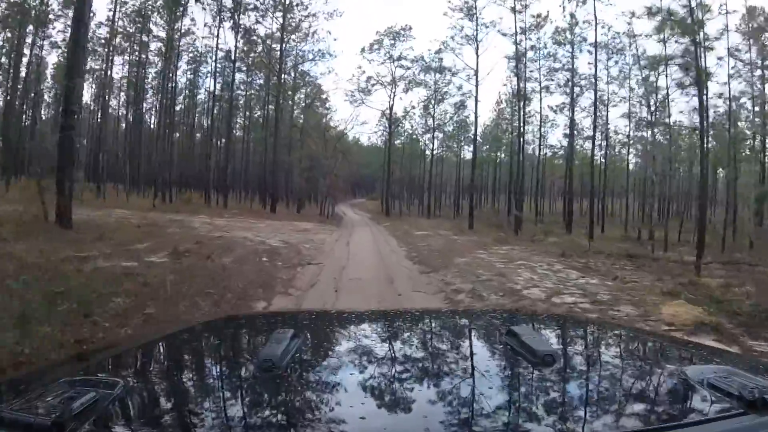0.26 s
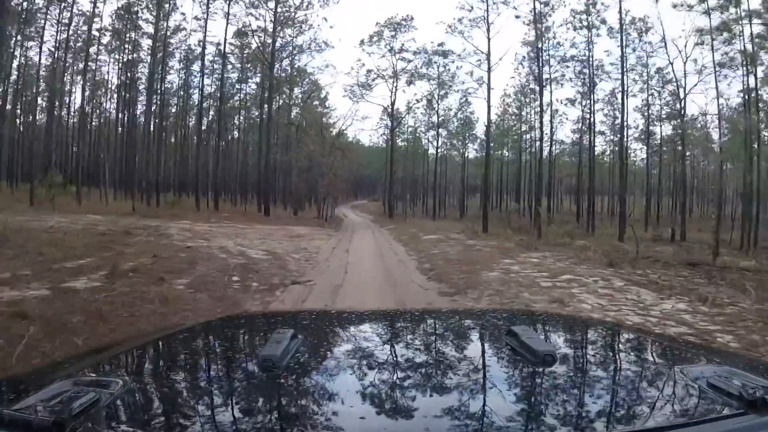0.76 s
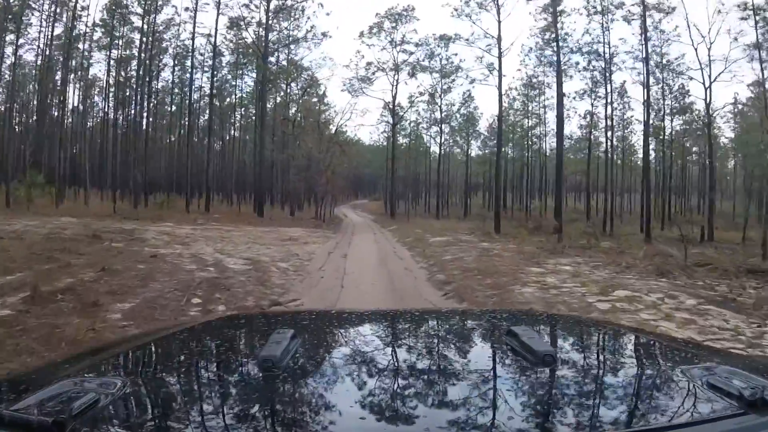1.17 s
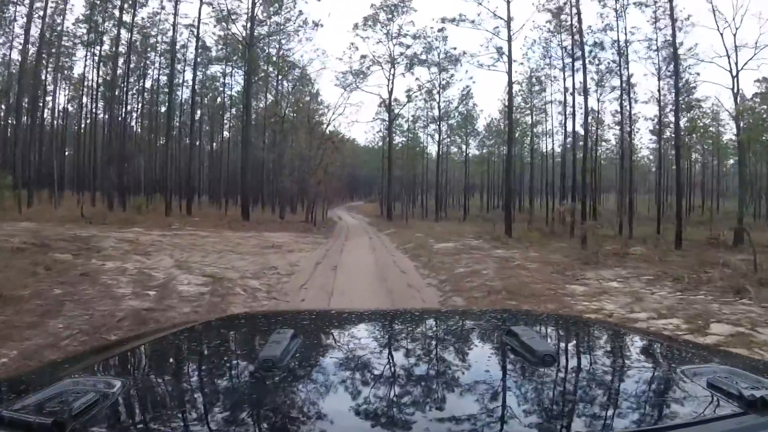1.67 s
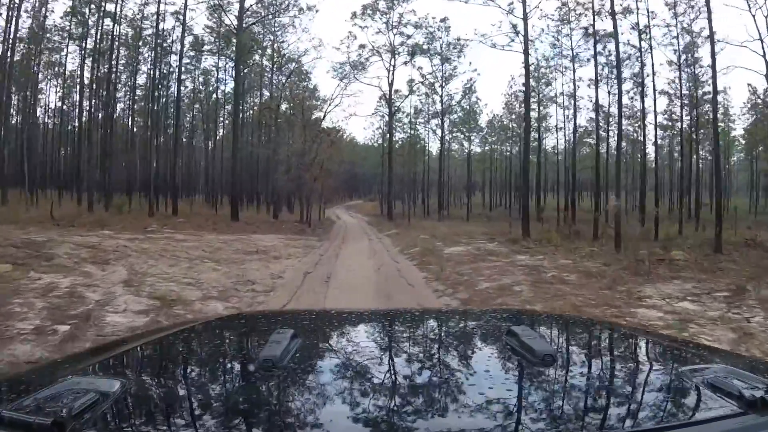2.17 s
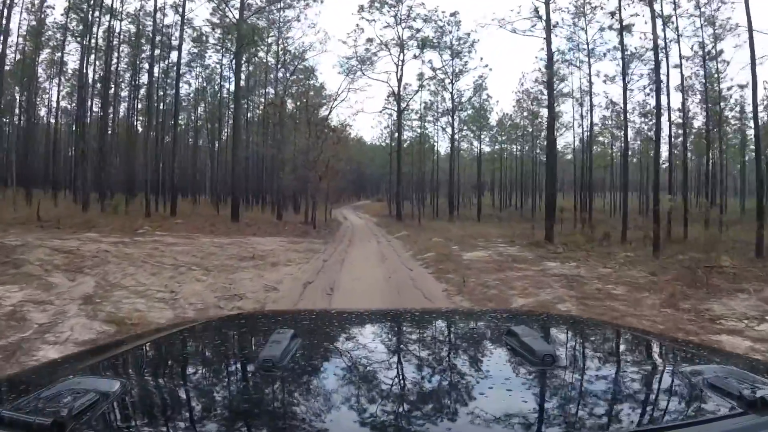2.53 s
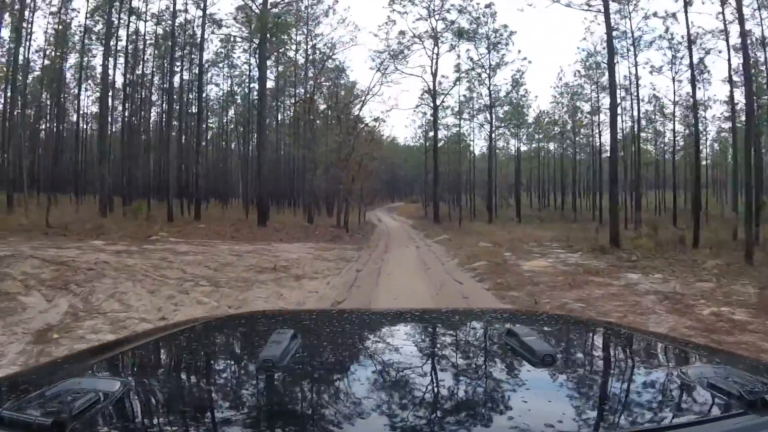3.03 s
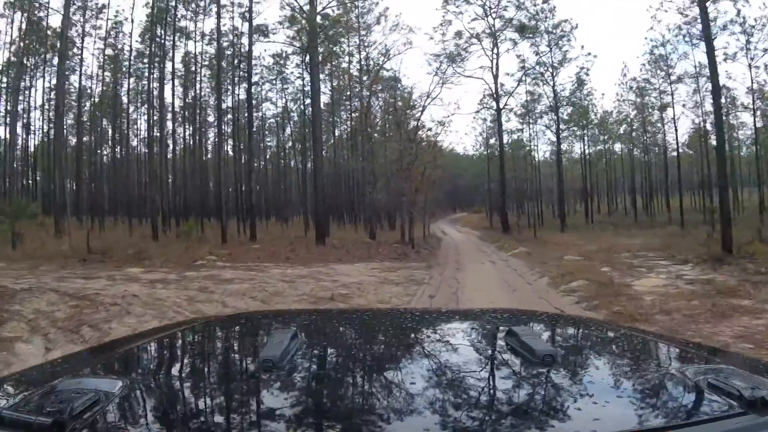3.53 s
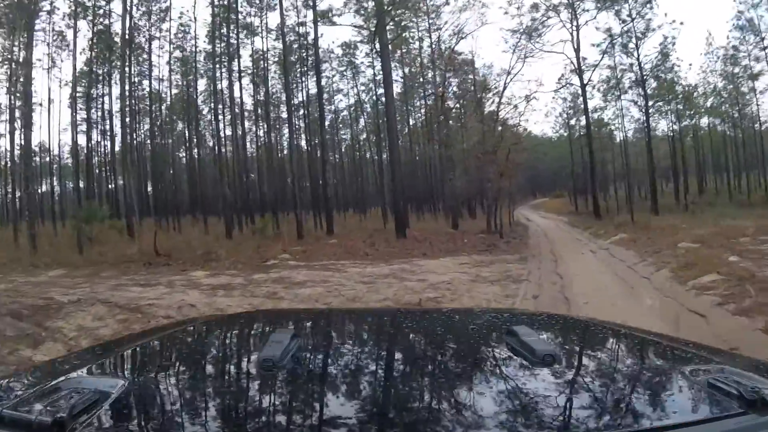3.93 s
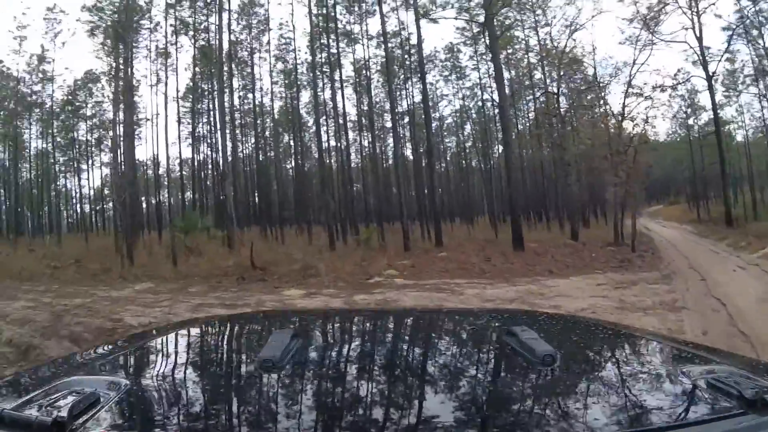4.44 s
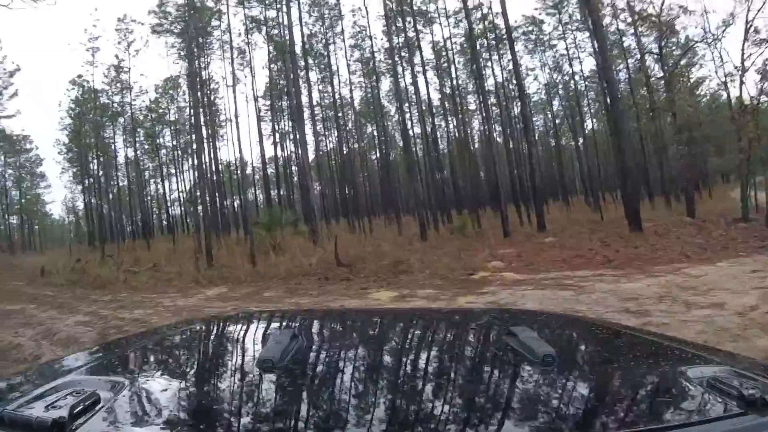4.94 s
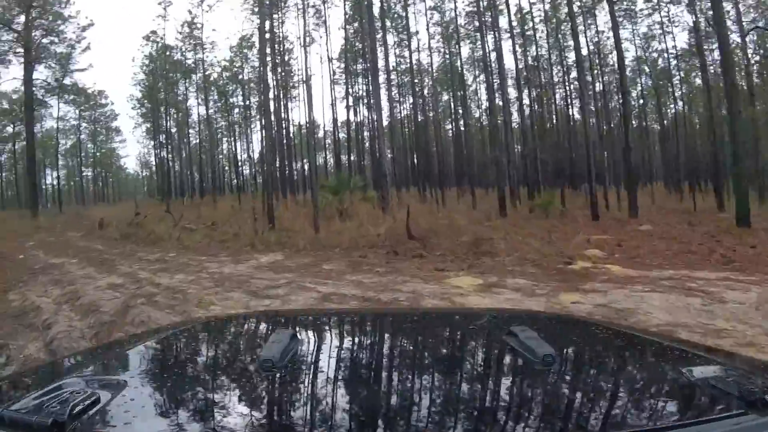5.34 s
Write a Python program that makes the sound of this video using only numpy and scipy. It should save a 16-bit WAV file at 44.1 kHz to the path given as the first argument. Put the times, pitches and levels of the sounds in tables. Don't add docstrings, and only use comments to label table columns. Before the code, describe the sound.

Inside an off-road vehicle's cab on a sandy forest trail, a heavy, bassy engine rumble fills the sound. From 0 to about 2.7 seconds its pitch sinks steadily as the vehicle slows, with a faint thin gear hum gliding down alongside and stopping near 2.75 as the drive briefly unloads. The engine then holds a low, uneven throb. Throughout, the body shudders over ruts, tyres rumble and thud on roots, muffled road roar comes through the floor and fine sand hisses softly. Early trim noises are sparse, with a small rap and tick at 1.9. From 3.4 they increase, crowding between 3.8 and 4.45 with dull knocks, bright raps and thin ticks, strongest near 4.17; a short fan of sand hisses at 4.3. After 5 seconds a low boom arrives, climbs and swells around 5.45, with a few last knocks. Faint steady microphone hiss lies underneath.

```python
import sys
import numpy as np
from scipy import signal
from scipy.io import wavfile
from scipy.ndimage import uniform_filter1d

SR = 44100
rng = np.random.default_rng(int(sys.argv[2]) if len(sys.argv) > 2 else 0)


def digitize_waveform(pressure):
    field = np.atleast_2d(pressure).T
    bounded = np.clip(field, -1, 1)
    quanta = np.round(bounded * 32767).astype(np.int16)
    wavfile.write(sys.argv[1], SR, quanta)


def makeup_ratio(level_db):
    decades = np.asarray(level_db, float) / 20
    return 10 ** decades


N = 246947
T = np.arange(N) / SR


def evened(x):
    return x / np.sqrt(np.mean(x ** 2) + 1e-20)


def column(rows, index):
    rows = np.array(rows)
    return np.interp(T, rows[:, 0], rows[:, index])


def wander(top_hz):
    t = T[::256]
    slow = np.zeros(len(t))
    for f in np.geomspace(top_hz / 20, top_hz, 16):
        slow += np.sin(2 * np.pi * (f * t + rng.random())) / np.sqrt(f)
    return np.interp(T, t, evened(slow))


def lift(passing_hz, peaks):
    coarse_hz = passing_hz[::256]
    gain_db = sum(top_db / (1 + ((coarse_hz - hz) / width) ** 2) for hz, width, top_db in peaks)
    return np.interp(T, T[::256], gain_db)


def swells(rows):
    return sum(db * np.exp(-((T - s) / length) ** 2) for s, db, length in rows)


def noise(spectrum, patchy_db, flicker_db, size):
    frames = 4 * N // size + 5
    hz = np.fft.rfftfreq(size, 1 / SR)
    real, imaginary, patches = rng.standard_normal((frames, len(hz), 3)).T
    patches = uniform_filter1d(patches, size=8, axis=0)
    patches = evened(uniform_filter1d(patches, size=10, axis=1))
    flicker = rng.standard_normal(frames)
    f, db = np.transpose(spectrum)
    colour_db = np.interp(np.log(hz + 1), np.log(f + 1), db, left=-90, right=-90)[:, None]
    z = (real + 1j * imaginary) * makeup_ratio(colour_db + patchy_db * patches + flicker_db * flicker)
    return evened(signal.istft(z, nperseg=size, noverlap=size * 3 // 4)[1][:N])


# t/s, crank rate/turns per s
CRANK = [(0.0, 17.64), (0.6, 17.03), (1.2, 15.74), (2.1, 13.27), (2.65, 11.88), (3.3, 12.1), (4.1, 11.85),
         (4.45, 11.4), (4.62, 11.5), (4.88, 11.25), (5.05, 11.38), (5.2, 11.7), (5.6, 11.75)]
# t/s, level/dB
LOAD = [(0.0, -28), (0.15, 0), (0.7, 3.5), (0.8, -1), (1.02, 2), (1.12, -1.5), (2.0, 2), (2.62, -0.5),
        (2.8, -20), (3.0, -1), (3.5, -2.5), (4.4, -4), (4.58, 1.5), (4.74, -3.5), (4.88, 2), (5.15, 3),
        (5.3, -2.5), (5.6, -1.5)]
STRONG_ORDERS = (2, 3, 6, 12)
STRONG_DB = [-41, -44, -56, -61.5]
LOAD_SHARE = [2.23, 0.37, 1.6, 0.6]
WEAK_ORDERS = (4, 5, 7, 8, 9, 10, 11, 13, 14, 15, 16, 17, 18, 20, 21, 24)
WEAK_DB = [-44.5, -56, -62.5, -59, -62, -64.5, -62.5, -78, -85, -71.5, -74.5, -69.5, -58, -70, -67, -72]
# f/Hz, width/Hz, level/dB
BOOMS = [(32.65, 1.18, 16.5), (45.7, 2.5, 9), (68, 2.12, 21), (74.5, 2.4, 11.5), (86.9, 2.9, 16),
         (136.1, 5.4, 12), (145.7, 5.1, 9), (164.1, 7.6, 17), (180.7, 4.3, 12)]
# f/Hz, width/Hz, level/dB
PANELS = [(86, 7.2, 7.5), (125.6, 2.9, 9.5), (169, 9.4, 8), (220, 4.9, -1), (258.8, 2.8, 9),
          (300.5, 4.7, 2)]


def engine():
    speed = column(CRANK, index=1)
    load_db = column(LOAD, index=1)
    turns = np.cumsum(speed) / SR
    out = np.zeros(N)
    for order, db, share in zip(STRONG_ORDERS, STRONG_DB, LOAD_SHARE):
        phase = order * turns + rng.random() + 0.016 * wander(25.0)
        level_db = db + share * load_db + lift(order * speed, BOOMS)
        out += makeup_ratio(level_db) * np.sin(2 * np.pi * phase)
    for order, db in zip(WEAK_ORDERS, WEAK_DB):
        phase = order * turns + rng.random() + 0.015 * wander(6.5)
        level_db = db + lift(order * speed, PANELS) + 2.92 * wander(1.41)
        out += makeup_ratio(level_db) * np.sin(2 * np.pi * phase)
    return np.sqrt(2) * out, turns


# t/s, f/Hz
MESH = [(0.0, 390.2), (0.8, 367.6), (1.2, 344.0), (2.2, 282.7), (2.75, 254.0)]
# f/Hz, width/Hz, level/dB
HOUSING = [(359.8, 22, 20), (305.4, 10, 15), (266, 17.4, 18)]


def gear():
    gear_db, unload_s = -73, 2.75
    mesh_hz = column(MESH, index=1)
    phase = np.cumsum(mesh_hz) / SR + 0.01 * wander(1.7)
    loaded = np.clip((unload_s - T) / .1, 0, 1)
    return np.sqrt(2) * makeup_ratio(gear_db + lift(mesh_hz, HOUSING)) * loaded * np.sin(2 * np.pi * phase)


# t/s, level/dB
WORK = [(0.0, 1), (0.1, 4), (0.9, 3), (1.4, 1.3), (2.4, 0.1), (3.1, 0), (3.9, 1), (4.25, 3), (4.45, 2),
        (4.7, 0), (5.0, -1.2), (5.2, 2.2), (5.4, 1.5), (5.6, 0.5)]


def worked(level_db, share):
    return level_db + share * column(WORK, index=1)


def stiffened(x, share=0.45):
    swing = np.sqrt(uniform_filter1d(x ** 2, size=1500) + 0.049)
    return evened(x / swing ** share)


# f/Hz, level/dB per Hz
SHAKE = [(7.1, -18), (12, -24), (21, 5), (32, 10), (48, 5.5), (65, -11.5), (77, -8), (90, -18.5),
         (120, -17.5), (200, -120)]
# t/s, level/dB, length/s
BUMPS = [(0.09, 9, 0.048), (0.31, 9, 0.038), (0.67, 7, 0.15), (0.97, 9, 0.063), (1.15, 12, 0.061),
         (1.39, 13, 0.037), (1.66, 12, 0.043), (2.11, 10, 0.033), (2.33, 3, 0.057), (2.55, 11, 0.024),
         (2.72, 7, 0.029), (2.92, 2, 0.14), (3.22, 3, 0.051), (3.51, 13.5, 0.016), (3.65, 8, 0.026),
         (4.05, 9.5, 0.026), (4.25, 11.5, 0.045), (4.53, 7, 0.036), (4.72, 9.5, 0.037), (5.07, 1, 0.059),
         (5.45, 0, .06)]


def shake():
    level_db = worked(-31.5, share=0.75) + swells(BUMPS) - 6
    return makeup_ratio(level_db) * stiffened(noise(SHAKE, 0.95, 0.43, size=8192))


ROLL = [(55, -22), (70, 7), (80, 1.5), (95, -0.5), (113, -18), (135, -3.5), (170, -21.5), (230, -24),
        (270, -17)]
# t/s, level/dB, length/s
THUDS = [(0.13, 10, 0.02), (0.27, -15, 0.029), (0.5, 4, 0.17), (1.04, 11, 0.062), (1.29, 7, 0.041),
         (1.72, 6, 0.098), (2.0, 7, 0.079), (2.44, 4, 0.035), (2.72, 5.5, 0.059), (2.95, 2.5, .08),
         (3.27, 6, 0.05), (3.42, 8, 0.082), (3.49, 11, .03), (3.85, 13.5, 0.21), (4.25, 13, 0.06),
         (4.5, 10, 0.16), (4.76, 12, .06), (5.29, 11, 0.079), (5.58, 13, .05)]


def roll():
    level_db = worked(-45, share=0.13) + swells(THUDS) - 4.5
    return makeup_ratio(level_db) * noise(ROLL, 2.5, 0.4, size=4096)


def breath(turns):
    return 0.15 * np.cos(2 * np.pi * turns) + 0.26 * np.cos(6 * np.pi * turns)


# f/Hz, level/dB per Hz
ROAR = [(110, -28.5), (180, 0), (210, -3.5), (273, -1), (388, -10.5), (494, -5.5), (589, -13), (900, -36),
        (1170, -27), (1980, -120)]


def roar(turns):
    return makeup_ratio(worked(-51, share=0.43) + breath(turns)) * noise(ROAR, 1.38, 1.0, size=2048)


# f/Hz, level/dB per Hz
HISS = [(410, -72), (700, 0), (1230, -7), (1480, -5.5), (1900, -11), (2060, -8.5), (2700, -11.5),
        (3250, -9.5), (3590, -18.5), (4200, -23), (5460, -43), (9240, -120)]


def hiss(turns):
    return makeup_ratio(worked(-59, share=0.9) + breath(turns)) * noise(HISS, 1.28, 0.57, size=512)


# f/Hz, level/dB per Hz
SAND = [(3200, -35), (3700, -7), (4100, -2.5), (4800, 4.5), (5500, 5), (6000, 1.5), (6600, -13),
        (8000, -23)]


def spray():
    scrub_db = swells([(4.3, 7.5, 0.082)])
    return makeup_ratio(worked(-73.5, share=0.93) + scrub_db) * noise(SAND, 1.24, 0.74, size=512)


# f/Hz, t60/s
TRIM = [(270, 0.042), (350, 0.055), (450, .04), (560, .04), (630, 0.032), (700, 0.016), (780, 0.084),
        (950, 0.0073), (1200, 0.017), (1500, 0.015), (1800, 0.0032), (2150, 0.006), (2500, 0.011),
        (2900, 0.035), (3400, 0.005), (3900, 0.0085), (4500, 0.01), (5200, 0.0059), (5900, 0.0067),
        (6600, 0.014), (7500, 0.0019), (8600, 0.0044)]


def rattle(peak_db, hz, spread, length):
    t = np.arange(4096) / SR
    length = max(length, .001)
    white, contact = rng.standard_normal((2, 4096))
    drive = white * (0.18 + (abs(contact) > 2.2)) * np.exp(-t / length)
    drive[0] = 0.052 / np.sqrt(length)
    ring = np.zeros(4096)
    for f, t60 in TRIM:
        mode_db = -6 * (np.log2(f / hz) / spread) ** 2 - 60 * t / t60
        ring += makeup_ratio(mode_db) * np.sin(2 * np.pi * f * t) / np.sqrt(t60)
    lowpass = signal.butter(6, 9300., fs=SR)
    out = signal.lfilter(*lowpass, signal.fftconvolve(drive, ring)[:4096])
    return makeup_ratio(peak_db) * out / abs(out).max()


def grit():
    hit = rng.random(N) < 60 / SR
    clicks = makeup_ratio(2.6 * np.minimum(rng.exponential(1, N), 2.8)) * hit
    grain = rattle(0, 1500, 1.1, .003)
    return makeup_ratio(worked(-70.0, share=1)) * evened(signal.oaconvolve(clicks, grain)[:N])


# f/Hz, level/dB per Hz
PORT = [(4500, -35), (6050, -14), (6480, 0.5), (7000, -7.5), (8200, -10), (9500, -12.5), (10300, -18.5),
        (11700, -14.5), (13000, -17), (13800, -26), (14300, -49)]


def microphone_hiss():
    return makeup_ratio(-67.5 - 0.56) * noise(PORT, 0.8, 0.16, size=1024)


# t/s, peak level/dB, f/Hz, spread/octaves, length/s
RAPS = [(0.152, -40, 1600, 0.79, 0.0088), (1.906, -37.5, 1800, 0.15, 0.0023),
        (2.373, -45, 1684, 0.22, 0.013), (2.753, -47, 1500, .1, 0.0067), (3.478, -43, 1150, 0.25, 0.0034),
        (3.479, -47, 1800, 0.14, 0.009), (3.544, -41.5, 1170, 0.1, .004), (3.917, -30, 2180, 1.4, 0.013),
        (3.999, -35.5, 1900, 0.4, 0.006), (4.164, -40.5, 1500, 0.18, 0.006),
        (4.178, -35, 1330, 0.22, 0.006), (4.432, -38.5, 1500, 0.8, 0.0091),
        (4.437, -35, 2410, 0.48, 0.0045), (5.060, -47, 1490, 0.61, .005), (5.13, -43, 1450, 0.25, 0.009),
        (5.200, -42.5, 1410, 0.37, 0.0076), (5.368, -44, 2000, 0.26, 0.0051)]
# t/s, peak level/dB, f/Hz, spread/octaves, length/s
TICKS = [(0.318, -48, 5000, .5, 0.0037), (1.906, -45.5, 3640, 0.34, 0.012),
         (2.139, -43, 3400, 0.13, 0.0033), (2.14, -44.5, 5760, 0.12, 0.007),
         (3.418, -45.5, 5480, 0.67, 0.035), (3.917, -38.5, 4600, 0.25, 0.0044),
         (4.002, -51, 6000, 0.28, 0.0092), (4.176, -41, 4540, 0.58, 0.019), (4.229, -44, 5260, 0.15, 0.018),
         (4.547, -48, 6000, 0.42, 0.013), (5.204, -53, 5500, 0.34, 0.014), (5.555, -47, 3980, 0.4, 0.0058)]
# t/s, peak level/dB, f/Hz, spread/octaves, length/s
KNOCKS = [(0.562, -45.5, 1030, 0.19, 0.059), (3.823, -40.5, 494, 0.15, 0.035),
          (3.967, -37.5, 328, 0.16, 0.016), (1.909, -41, 910, 0.14, 0.0078),
          (3.543, -32.5, 294, 0.18, 0.0044), (3.952, -31, 650, 0.75, 0.0036),
          (4.089, -32.5, 750, 0.7, 0.0066), (4.174, -24.5, 610, 0.16, 0.0045),
          (4.195, -36, 280, 0.37, 0.017), (4.24, -32, 303, 0.33, 0.025), (4.436, -31, 325, 0.27, 0.018),
          (4.591, -45, 1030, 0.28, 0.032), (4.619, -38.5, 392, 0.35, 0.0055),
          (5.227, -32, 258, 0.15, 0.018)]


def trim():
    out = np.zeros(N + 4096)
    for s, *blow in KNOCKS + RAPS + TICKS:
        start = round(s * SR)
        out[start:start + 4096] += rattle(*blow)
    return out[:N]


# t/s, f/Hz, level/dB
HEAVE = [
    (4.95, 32.45, -65),
    (5.1, 32, -30),
    (5.3, 36.9, -35),
    (5.45, 40.6, -27),
    (5.6, 42.3, -31.5),
]


def heave():
    phase = np.cumsum(column(HEAVE, index=1)) / SR
    return np.sqrt(2) * makeup_ratio(column(HEAVE, index=2)) * np.sin(2 * np.pi * phase)


def sparse_top(x, from_hz, keep, hole_db):
    hz, _, z = signal.stft(x, SR, nperseg=1536, noverlap=768)
    power = abs(z) ** 2
    usual = uniform_filter1d(np.median(power, axis=-1, keepdims=True), size=9, axis=-2)
    fade_in = np.clip((hz[:, None] - from_hz) / 700, 0, 1)
    bar = keep * makeup_ratio(0.7 * rng.standard_normal(z.shape[-1])) * fade_in
    gain = np.where(power < bar * usual, makeup_ratio(hole_db), 1)
    return signal.istft(z * gain, SR, nperseg=1536, noverlap=768)[1][:, :N]


def scene():
    orders, turns = engine()
    road = shake() + roll() + roar(turns) + hiss(turns)
    return (orders + gear() + road + spray() + grit() + trim() + heave())[None]


def band_limit(x):
    return signal.sosfilt(signal.butter(12, 14320, fs=SR, output="sos"), x)


def record(dry):
    heard = (dry + microphone_hiss()) * np.clip((T[-1] - T) / .006, 0, 1)
    mix = sparse_top(heard, from_hz=9170, keep=1.9, hole_db=-22)
    return band_limit(mix)


dry = scene()
out = record(dry)
digitize_waveform(out)
```